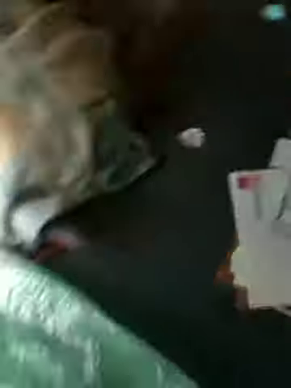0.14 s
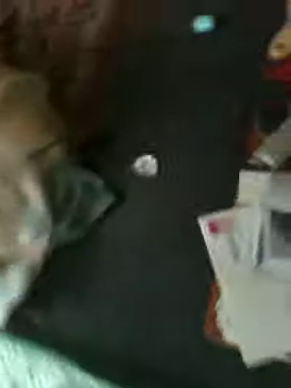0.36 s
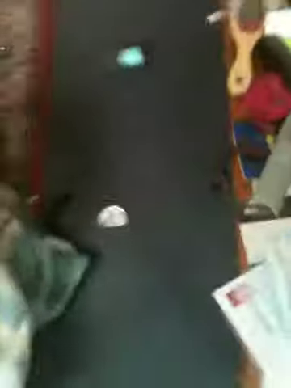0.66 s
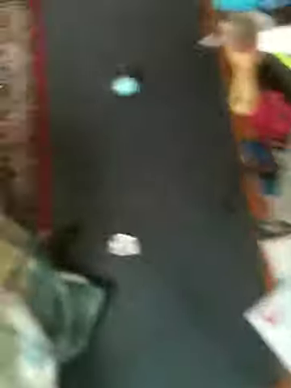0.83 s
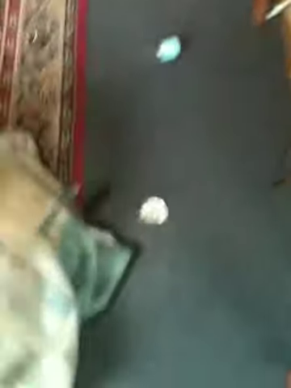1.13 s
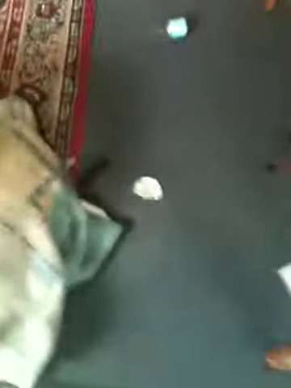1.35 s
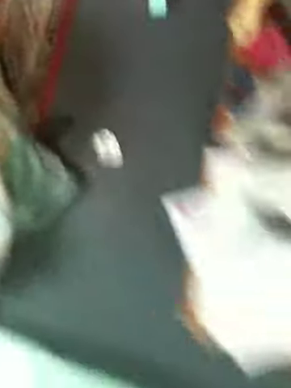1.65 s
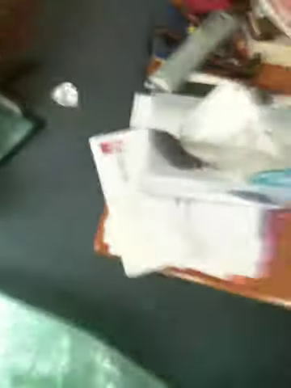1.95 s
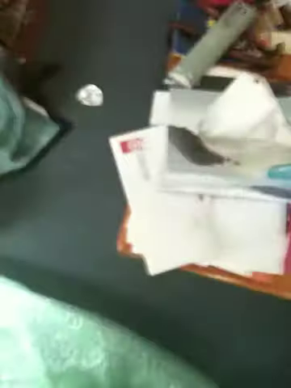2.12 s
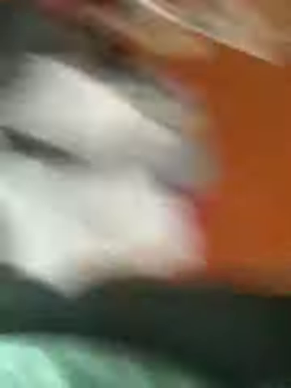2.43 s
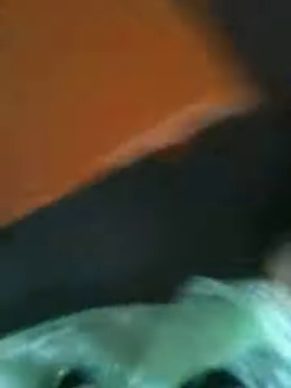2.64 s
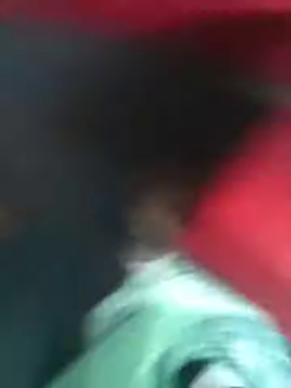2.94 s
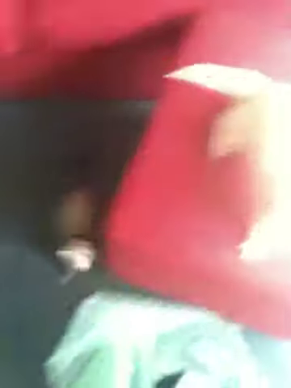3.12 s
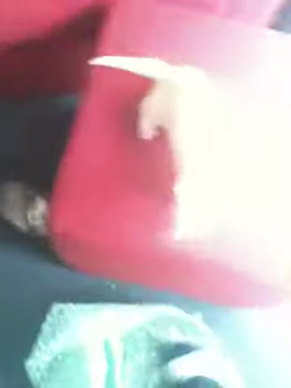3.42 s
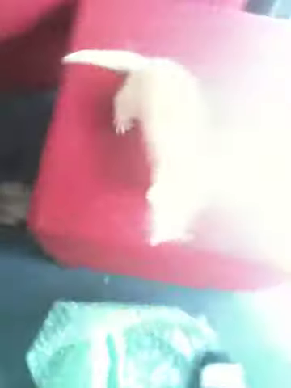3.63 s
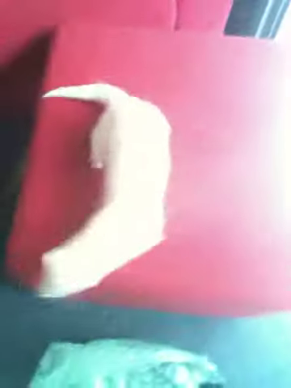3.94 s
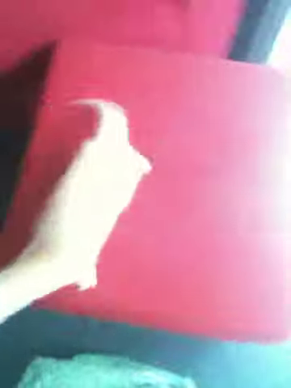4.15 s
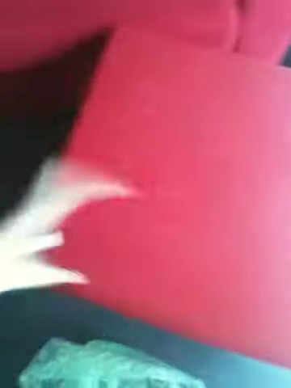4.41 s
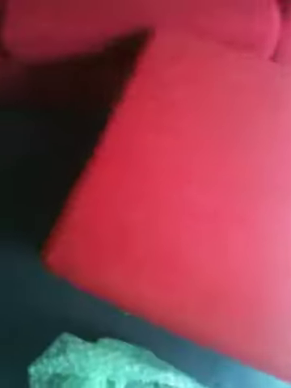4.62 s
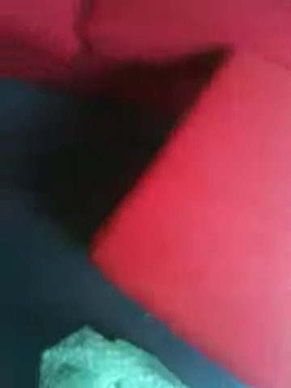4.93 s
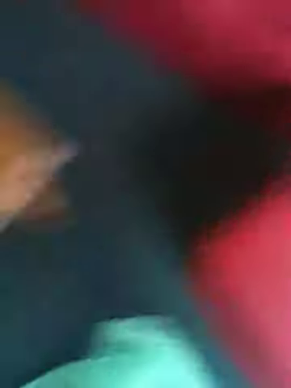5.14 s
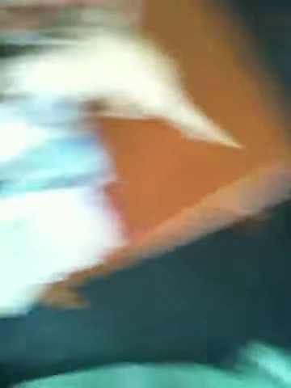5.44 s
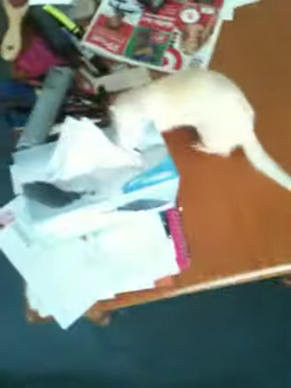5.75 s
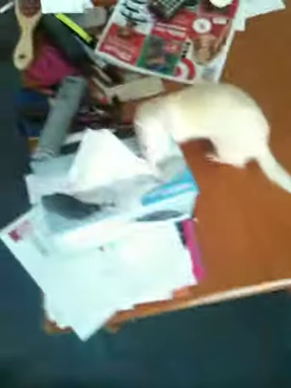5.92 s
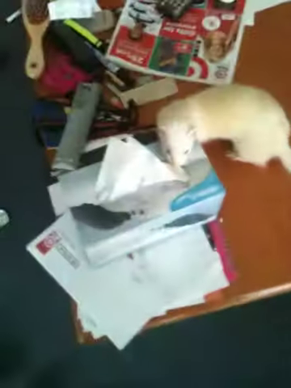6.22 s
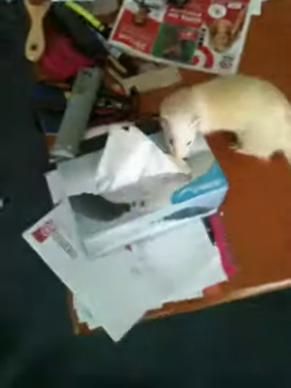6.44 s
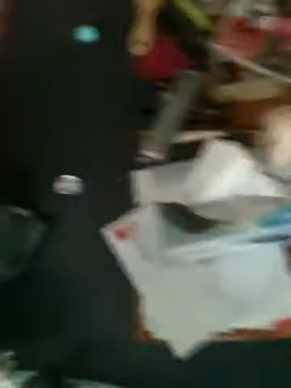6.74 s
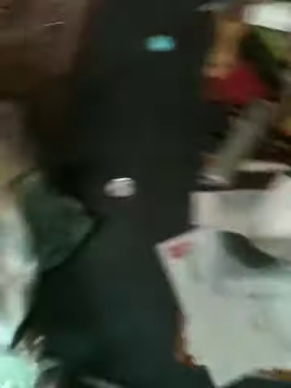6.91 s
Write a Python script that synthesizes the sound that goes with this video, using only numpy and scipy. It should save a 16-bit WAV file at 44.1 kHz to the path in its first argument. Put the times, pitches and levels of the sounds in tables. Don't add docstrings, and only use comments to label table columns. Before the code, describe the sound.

Ferrets scramble over bubble wrap on a carpeted living-room floor. Bubbles burst with hard, dry snaps in uneven clusters, each followed by a short room tail. Between them the film rustles and swells with every movement, tiny creases tick, and paws land softly. A phone microphone close by adds thin, low-bass sound and faint hiss.

```python
import sys
import numpy as np
from scipy import signal
from scipy.fft import rfft, irfft
from scipy.io import wavfile
from scipy.ndimage import uniform_filter1d, minimum_filter1d

SR = 44100
rng = np.random.default_rng(int(sys.argv[2]) if len(sys.argv) > 2 else 0)


def elevation(decibels):
    levels = np.asarray(decibels, float)
    return 10 ** (levels / 20)


def transcribe(signal):
    frames = np.atleast_2d(signal).T
    limited = np.clip(frames, -1, 1)
    pcm = np.round(limited * 32767).astype(np.int16)
    wavfile.write(sys.argv[1], SR, pcm)


N = 311787
SPIKE_S = 0.0004

# (frequency [Hz], level [dB])
RATTLE_COLOUR = [(2500, -0.5), (4000, 2), (6000, -1.5), (8500, 2.5), (11000, 0.5), (15000, -15)]


def evened(x):
    return x / np.sqrt(np.mean(x ** 2) + 1e-20)


def coloured(x, points):
    hz = np.fft.rfftfreq(len(x), 1 / SR)
    point_hz, point_db = np.transpose(points)
    pitch = np.log(np.minimum(hz, 14500) + 1)
    gain = elevation(np.interp(pitch, np.log(point_hz + 1), point_db))
    return evened(irfft(rfft(x) * gain, len(x)))


def add(mix, s, sound):
    part = mix[round(s * SR):][:len(sound)]
    part += sound[:len(part)]


def background():
    # (frequency [Hz], level [dB])
    hiss_colour = [(18, -56), (30, 5.5), (161, 7), (233, -9), (295, 4), (374, -6), (649, -3), (2290, -11),
                   (13700, -16), (14800, -30), (16000, -44)]
    # (frequency [Hz], level [dB])
    whine_tones = [(14971, -82), (15030, -84)]
    # (time [s], level [dB], pitch [Hz])
    squeak_path = [
        (3.45, -90, 1900),
        (3.53, -68, 1900),
        (3.72, -68, 1890),
        (3.8, -69, 1850),
        (3.87, -90, 1770),
    ]
    t = np.arange(N) / SR
    hiss = elevation(-63.5) * coloured(rng.standard_normal(N), hiss_colour)
    whine = sum(np.sqrt(2) * elevation(db) * np.sin(2 * np.pi * hz * t) for hz, db in whine_tones)
    s, db, hz = np.transpose(squeak_path)
    wobble = 1 + 0.008 * evened(uniform_filter1d(rng.standard_normal(N), size=300))
    phase = 2 * np.pi * np.cumsum(np.interp(t, s, hz) * wobble) / SR
    squeak = elevation(np.interp(t, s, db, -200, -200)) * np.sin(phase)
    return hiss + whine + squeak


def motion(base_db, per_weight, pinned_db):
    # (peak time [s], time to rise 10 dB [s], time to fall 10 dB
    # [s], peak level [dB], weight [dB])
    moves = [(0.01, .11, 0.12, -55.5, -6.5), (.27, 0.18, 0.17, -51.5, -6), (.385, 0.2, .05, -51, -6),
             (.575, .05, 0.2, -55, -4.5), (.75, .15, 0.06, -51, -0.5), (1.37, 0.16, 0.18, -60.5, 1),
             (1.72, 0.1, 0.14, -53, -3.5), (2.16, .14, 0.15, -49.5, -7.5),
             (2.254, 0.12, 0.07, -49.5, -3.5), (2.42, 0.04, 0.17, -57.5, -2.5),
             (2.94, 0.0756, 0.06, -48.5, -0.9), (3.28, 0.105, .08, -47, -4.5), (3.49, .12, .2, -55, -5),
             (3.9, 0.23, .03, -51, -12), (4.52, .2, .07, -60, -2), (4.77, 0.17, .12, -61.5, -2.5),
             (4.995, .04, 0.17, -55, -6), (5.135, 0.1, .15, -57, -6.5), (5.55, .2, .15, -53, -3),
             (5.70, .15, .12, -53, -9.5), (6.385, .012, .2, -50.5, -4), (6.5, .09, 0.1, -51, -7),
             (6.722, .14, .09, -44, -5), (6.82, 0.15, .11, -50, -4.5),
             (.865, 0.1, 0.13, -57.5, -0.2), (1.0, 0.12, 0.05, -55.5, 2), (1.15, .07, 0.06, -54, -8),
            (1.24, 0.2, .06, -65, -3), (1.53, 0.3, 0.14, -66, .6), (1.614, 0.15, -0.05, -59, -3.5),
            (2.04, 0, 0.16, -59.5, -3.5), (2.62, -0.01, .06, -69, 8), (2.70, .05, 0.08, -58, -1.5),
            (3.04, 0.06, 0.09, -53, 1), (3.15, 0.02, 0.15, -62, 5.5), (3.68, 0.1, 0.15, -62, -2.5),
            (3.97, .02, .09, -56, 1), (4.085, .03, 0.06, -52.5, -5), (4.19, 0.1, .05, -57.5, -1.5),
            (4.28, .05, 0.08, -62, 2.5), (4.335, .03, .025, -54, -6.5), (4.65, .06, 0.14, -72, 8),
            (5.374, 0.1, 0.04, -64, 2.5), (5.94, 0.2, 0.04, -65, 0.2), (6.07, 0.07, .07, -55.5, -2.2),
            (6.157, .025, .09, -56, -4), (6.26, .06, .08, -67, -5), (6.96, .11, .3, -59, -11)]
    t = np.arange(0, N + 64, 64) / SR
    s, rise, fall, db, weight = np.transpose(moves)[:, :, None]
    away = np.maximum((s - t) / np.maximum(rise, 1e-3), (t - s) / np.maximum(fall, 1e-3))
    load_db = base_db + per_weight * np.minimum(weight, pinned_db)
    gain = np.sqrt((elevation(db + load_db - 10 * away) ** 2).sum(0))
    return np.interp(np.arange(N) / SR, t, gain)


def crackle(per_s, spread_db, smooth_share, flicker_db, patch_db):
    sizes = elevation(spread_db * np.minimum(rng.exponential(1, N), 2.6))
    snaps = sizes * (rng.random(N) < per_s / SR)
    z = signal.stft(snaps * rng.choice([-1., 1.], N), nperseg=64)[2]
    patches = uniform_filter1d(rng.standard_normal(z.shape), size=9, axis=0)
    snaps = evened(signal.istft(z * elevation(patch_db * evened(patches)), nperseg=64)[1][:N])
    clumps = uniform_filter1d(rng.standard_normal(N), size=300)
    clumps = evened(uniform_filter1d(clumps, size=300))
    share = np.clip(smooth_share, 0, 1)
    texture = share * rng.standard_normal(N) + np.sqrt(1 - share ** 2) * snaps
    return elevation(flicker_db * clumps) * texture


def rustle():
    # (frequency [Hz], level [dB])
    film_colour = [(1760, -4.5), (3000, -7), (3400, -9), (4080, -5.5), (5370, -7), (6090, -2.5),
                   (8820, -0.5), (15100, -12), (16000, -60)]
    drag_colour = [(500, -13.5), (1000, -3), (2000, 0), (3500, -2), (6000, -1.5), (9000, -10.5)]
    scuff_colour = [(24, -55), (40, 6), (70, -4.5), (185, -3.5), (396, -2.5), (609, -6), (715, -5.5),
                    (1350, -10.5), (1800, -41), (2340, -41), (3960, -120)]
    # (level at no weight [dB], level per weight [dB/dB], weight that pins the sheet [dB])
    film_load = (0.11, -0.056, 30)
    drag_load = (0.1, 0.99, 1.5)
    scuff_load = (0.45, 1.56, 30)
    film = crackle(per_s=900, spread_db=7.0, smooth_share=0.83, flicker_db=1.3, patch_db=3.0)
    drag = crackle(per_s=1200, spread_db=2.5, smooth_share=0.86, flicker_db=0.9, patch_db=6.5)
    scuff = crackle(per_s=500, spread_db=-0.5, smooth_share=0.89, flicker_db=1.7, patch_db=0.85)
    out = motion(*film_load) * coloured(film, film_colour)
    out += motion(*drag_load) * coloured(drag, drag_colour)
    out += motion(*scuff_load) * coloured(scuff, scuff_colour)
    return out


def thuds():
    # (time [s], peak level [dB], pitch [Hz], scuff share [0-1])
    landings = [(2.999, -34.5, 210, 0.17), (3.959, -62, 439, 0.3), (4.059, -53.5, 436, 0.3),
                (4.161, -50.5, 304, 0.38), (4.359, -47, 144, 0.21), (4.409, -47.5, 635, 0.33),
                (4.459, -55, 423, 0.3), (4.605, -51.5, 586, 0.41), (4.639, -55, 498, 0.25),
                (4.659, -48.5, 595, 0.25), (5.145, -47.5, 665, 0.39), (5.373, -51.5, 378, 0.56),
                (6.149, -54, 165, 0.27), (6.376, -38.5, 780, 0.27)]
    # (frequency [Hz], level [dB])
    carpet_colour = [(24, -55), (40, 6), (70, -4.5), (185, -3.5), (396, -2.5), (609, -6), (715, -5.5),
                     (1350, -10.5), (1800, -41), (2340, -41), (3960, -120)]
    out = np.zeros(N)
    t = np.arange(4096) / SR
    for s, db, hz, share in landings:
        swing = -np.sin(2 * np.pi * hz * t) * np.exp(-(t * hz / 1.54) ** 2)
        brush = share * coloured(rng.standard_normal(len(t)), carpet_colour) * np.exp(-t / 0.028)
        soft_start = 1 - np.exp(-t / 0.00074)
        add(out, s + 0.00304, elevation(db + 2.0) * (swing + brush) * soft_start)
    return out


def ticks():
    # (time [s], peak level [dB], pitch [Hz])
    creases = [(0.1155, -41, 8400), (0.162, -38, 4980), (0.3494, -41, 9390), (0.3864, -38, 8480),
               (0.4598, -41, 6930), (1.884, -42, 10000), (2.0094, -42, 10200), (2.0558, -38, 9370),
               (2.0853, -39, 9060), (2.347, -41, 9120), (2.3889, -42, 9560), (2.7421, -45, 8770),
               (1.0697, -44, 8340), (3.8476, -40.5, 8430), (3.936, -37, 7620), (4.5809, -47, 8580),
               (5.1484, -36.5, 7400), (5.2618, -42, 6990), (5.537, -38.5, 7220), (5.7096, -36, 5930),
               (5.8594, -40, 4120), (5.983, -41.5, 7120), (6.1548, -41, 6780), (6.1862, -41, 9950),
               (6.2365, -40, 9190), (6.3219, -46, 8010), (6.5442, -39, 8550), (6.8344, -36, 8070),
               (6.9281, -42, 6780), (6.9889, -44.5, 8520)]
    out = np.zeros(N)
    t = np.arange(600) / SR
    for s, db, hz in creases:
        snap = -np.sin(2 * np.pi * hz * t) * np.exp(-t / 0.00027)
        scatter = 0.25 * coloured(rng.standard_normal(len(t)), RATTLE_COLOUR) * np.exp(-t / 0.0018)
        add(out, s + 0.00062, elevation(db + 3.0) * (snap + scatter))
    return out


def burst(t, width_ms, rebound_hz, share, ring_hz, rattle_db, noise):
    width = width_ms / 1000
    spike = np.exp(-((t - SPIKE_S) / width) ** 2)
    late = np.maximum(t - SPIKE_S - width / 2, 0)
    ease = 1 - np.exp(-late / (0.4 * width))
    rebound = 0.8 * share * np.sin(2 * np.pi * rebound_hz * late) * np.exp(-1.9 * rebound_hz * late)
    rebound += 0.12 * np.sin(2 * np.pi * 490 * late) * np.exp(-late / 0.00069)
    upper = 0.85 * np.sin(2 * np.pi * ring_hz * late) * np.exp(-late / 0.00097)
    lower = 0.49 * np.sin(2 * np.pi * 0.62 * ring_hz * late) * np.exp(-late / 0.00049)
    rattle = 0.7 * coloured(noise, RATTLE_COLOUR)
    rattle *= np.exp(-late / 0.00095) * (1 - np.exp(-late / 0.0001))
    return ease * (rebound + elevation(rattle_db + 6.0) * (upper + lower + rattle)) - spike


def tail(t, bright_db, bass_db, length, noise):
    # (centre frequency [Hz], level [dB], share of brightness [ratio],
    # time to fall 60 dB [s], rise time [s])
    room_bands = [(195, -15, 0.02, 0.42, 0.0067), (365, -3, 0., 0.21, 0.0075), (930, -4, 0.02, 0.3, 0.0035),
                  (1940, -5, 0.34, 0.26, 0.0026), (4200, -4.5, 0.93, 0.28, 0.00091),
                  (8000, -4.5, 1.1, 0.23, 0.0015), (13300, -15, 1.1, 0.14, .003)]
    z = rfft(noise)
    hz = np.fft.rfftfreq(len(t), 1 / SR)
    centres = np.log([row[0] for row in room_bands])
    out = np.zeros(len(t))
    for k, (_, db, share, t60, rise) in enumerate(room_bands):
        window = np.sqrt(np.interp(np.log(hz + 1), centres, np.arange(len(room_bands)) == k))
        window *= np.clip(hz / 67, 0, 1) ** 2
        band_db = db + share * bright_db + (share == 0) * bass_db
        shape = elevation(band_db - 60 * t / (t60 * length)) * (1 - np.exp(-(t / rise) ** 2))
        out += evened(irfft(z * window, len(t))) * shape
    near_walls = 1 + 0.41 / (1 + np.exp((t - 0.038) / 0.0056))
    early_dip = 1 - 0.26 * np.exp(-(t / 0.014) ** 2)
    return out * near_walls * early_dip


def pops():
    large_bubbles = {"large": [(0.6688, -20.5, -22, -19, 1.9), (0.6763, -26, -27, -6, 1.93),
                     (0.6806, -21, -24.5, 0.1, 2.01), (0.9677, -22, -25, -14, 2.1),
                     (3.2127, -19, -19, -14, 2.5), (3.2282, -29.5, -19.5, -11, 2.47),
                     (5.75, -20.5, -20, -14, 2.56)], "firm": [(2.5662, -21, -25, -7.5, 2.38),
                     (2.8145, -43, -21.5, -0.6, 2.49), (3.0479, -18.5, -20.5, -18, 2.9),
                     (3.1655, -15.5, -21, -10.5, 2.54)]}
    other_bubbles = {"small": [(0.5837, -17.5, -23, 3, 2.05), (5.1528, -44.5, -20.3, 6.5, 1.6)],
                     "slack": [(1.3034, -9.5, -30, -4.5, 2.24), (5.7896, -13, -24, -9.5, 2.38)],
                     "tiny": [(1.1582, -38, -29, -4, 2.18), (2.7705, -36, -34, -4, 3.06),
                     (5.7982, -31, -20, 1.1, 1.38)], "crisp": [(1.6649, -19.5, -26.5, 3.7, 2.02)],
                     "taut": [(0.884, -4.5, -40, 6.5, 1.45)], "cupped": [(0.9229, -6.5, -31, -6, 2.68)],
                     "flat": [(4.205, -4.5, -35.5, -1.5, 1.552)],
                     "ringing": [(0.6141, -17, -27.5, -1, 1.6)],
                     "thin": [(0.6941, -16.5, -21.5, -2.5, 2.09)],
                     "pressed": [(3.4305, -25.5, -18.5, -13, 2.36), (5.8771, -26, -16.5, -16, 2.43)]}
    skins = {"large": (0.085, 580, 1.05, 3300, -14), "firm": (0.063, 900, 1.45, 3900, -14),
             "small": (0.014, 620, 1.3, 5400, -12.5), "crisp": (0.014, 1090, 0.55, 2520, -19),
             "slack": (0.031, 700, 0.4, 8800, -24), "tiny": (0.036, 3000, 2.05, 6500, -15),
             "taut": (0.036, 5000, 1.1, 8250, -20.5), "cupped": (0.05, 1600, 1.15, 9200, -16),
             "flat": (0.041, 1700, 0.7, 4400, -25), "ringing": (0.038, 500, 0.73, 4100, -5),
             "thin": (0.028, 480, 1.06, 9500, -7), "pressed": (0.06, 600, 1.15, 6800, -8)}
    seats = {"large": (-7.5, 3.5, 0.95), "firm": (-5.5, 3.0, 0.92), "small": (-7, 6.5, 0.85),
             "crisp": (-3.5, 4.5, 0.78), "slack": (-6.5, 2.5, 0.95), "tiny": (-12, 2.5, 0.77),
             "taut": (-23, 8, 0.95), "cupped": (-15, -4.5, 0.99), "flat": (-2.5, 0.6, 1.05),
             "ringing": (-16, 8, 0.93), "thin": (-2.5, 4, 0.98), "pressed": (4.5, 4.5, 0.93)}
    groups = large_bubbles | other_bubbles
    rows = sorted((*row, kind) for kind, group in groups.items() for row in group)
    out = np.zeros(N)
    t = np.arange(16384) / SR
    density = np.clip(0.25 + 12 * t, 0.05, 1)
    for s, db, room_db, bright_db, ms, kind in rows:
        *shape, rattle_db = skins[kind]
        bounce_db, bass_db, length = seats[kind]
        noise = rng.standard_normal(len(t)) * (rng.random(len(t)) < density) / np.sqrt(density)
        rattle_db += 0.79 * bright_db
        direct = burst(t[:512], *shape, rattle_db, noise[-512:])
        duller = uniform_filter1d(direct, size=3)
        dullest = uniform_filter1d(duller, size=3)
        start = s - SPIKE_S
        add(out, start, elevation(db) * direct)
        add(out, start + ms / 1000, elevation(db + bounce_db) * duller)
        add(out, start + 2 * ms / 1000, elevation(db + min(bounce_db, 0) - 13.5) * dullest)
        bass_db += 0.45 * (room_db + 22)
        add(out, s, elevation(db + room_db - 0.48) * tail(t, bright_db, bass_db, length, noise))
    return out


def scene():
    return (background() + rustle() + thuds() + ticks() + pops())[None]


def low_pass(x):
    return signal.sosfilt(signal.butter(12, 16830, fs=SR, output="sos"), x)


def record(dry):
    bass_cut = signal.butter(2, 190, "high", fs=SR, output="sos")
    x = signal.sosfilt(bass_cut, dry) + 0.023 * dry
    top = signal.oaconvolve(x, signal.firwin(129, 10800, pass_zero=False, fs=SR)[None], "same")
    loud = np.roll(abs(x) > elevation(-18.5), 240, axis=1)
    keep = minimum_filter1d(1. - loud, size=720, origin=359)
    x = x - top * uniform_filter1d(1 - keep, size=40)
    below = signal.oaconvolve(x, signal.firwin(255, 15800, fs=SR)[None], "same")
    x = below + elevation(-23.0) * (x - below)
    return low_pass(x)


dry = scene()
out = record(dry)
transcribe(out)
```